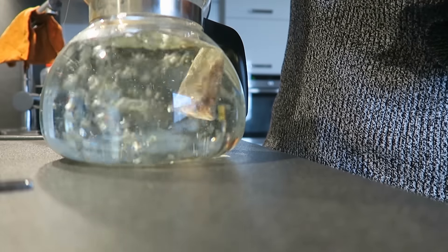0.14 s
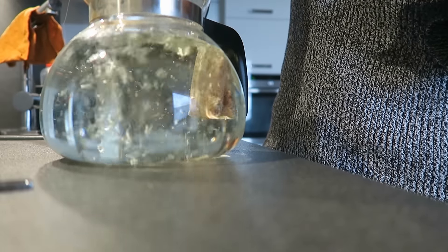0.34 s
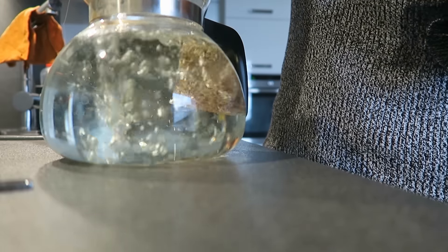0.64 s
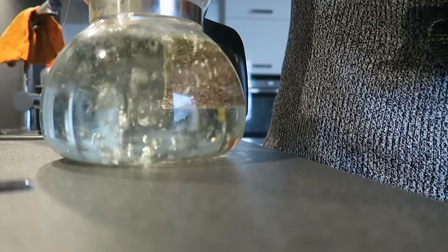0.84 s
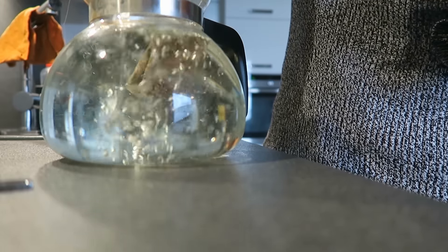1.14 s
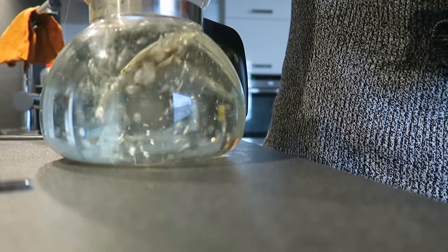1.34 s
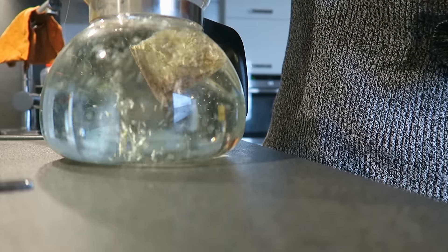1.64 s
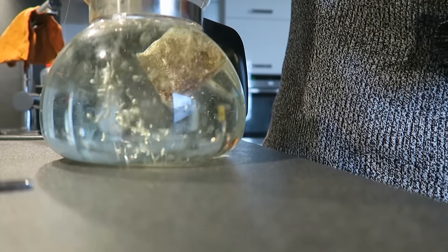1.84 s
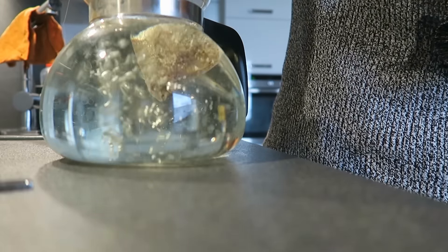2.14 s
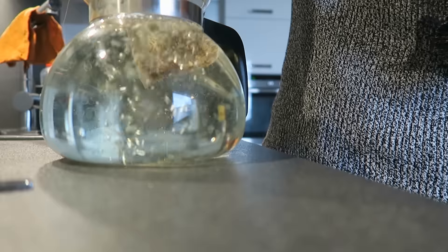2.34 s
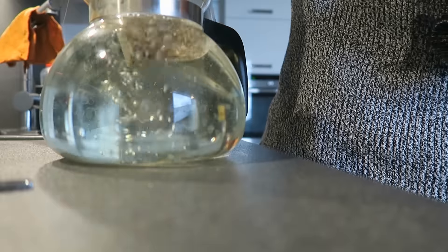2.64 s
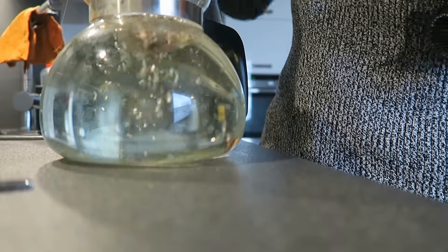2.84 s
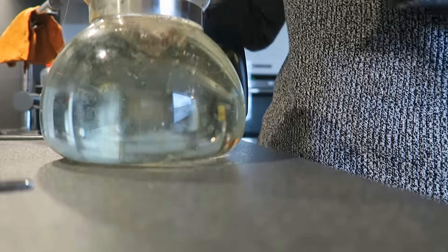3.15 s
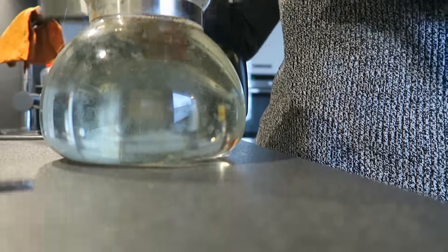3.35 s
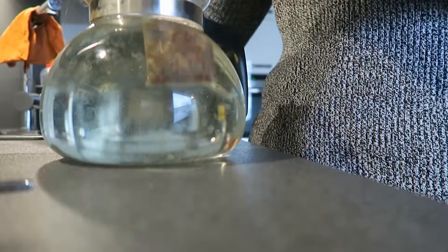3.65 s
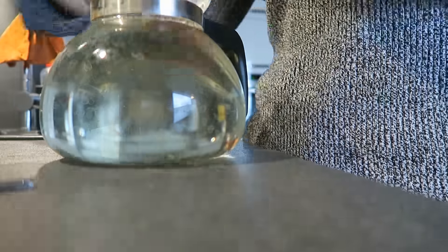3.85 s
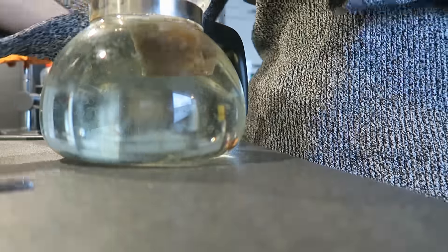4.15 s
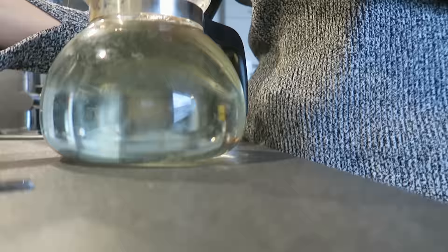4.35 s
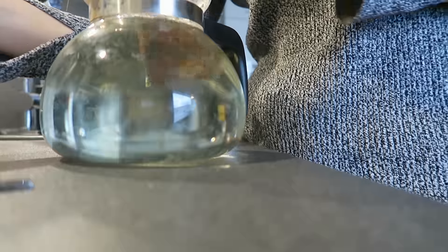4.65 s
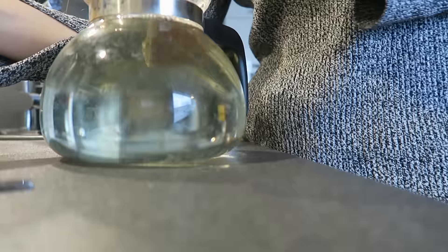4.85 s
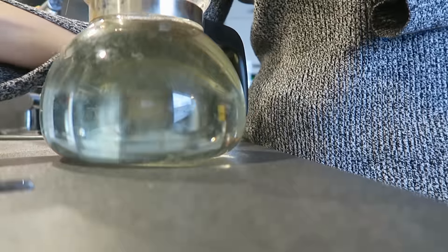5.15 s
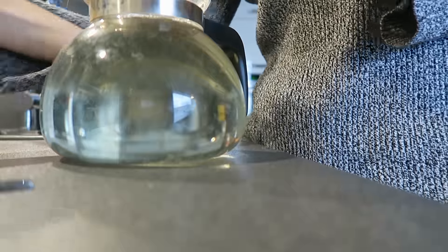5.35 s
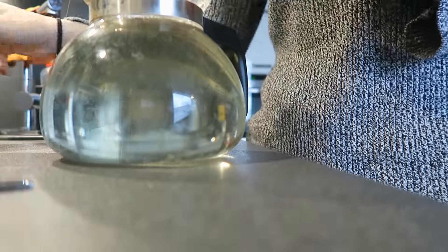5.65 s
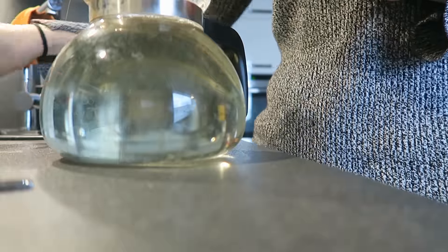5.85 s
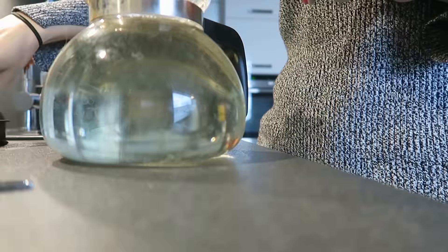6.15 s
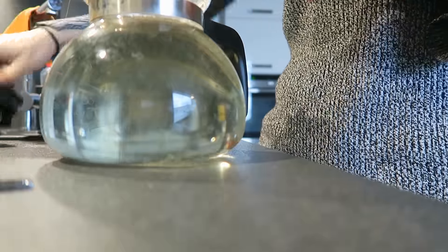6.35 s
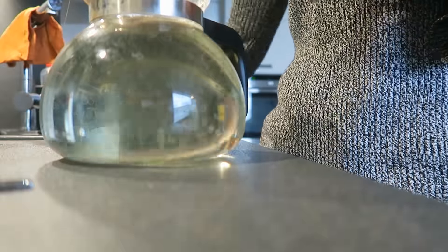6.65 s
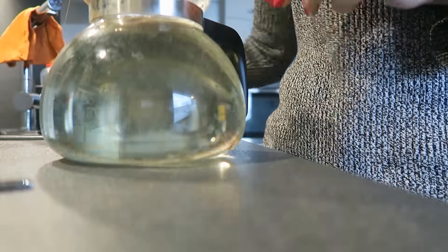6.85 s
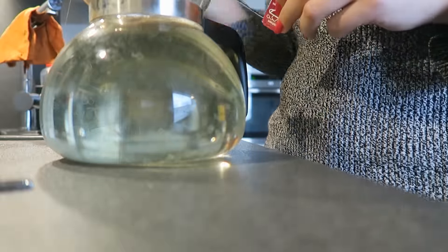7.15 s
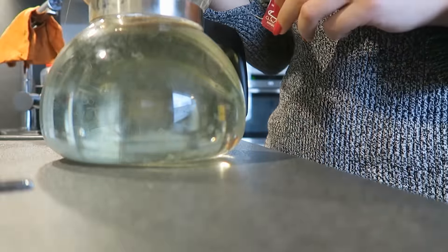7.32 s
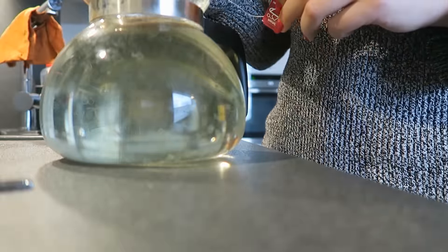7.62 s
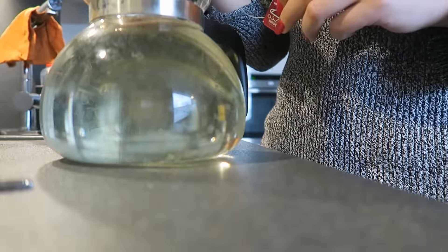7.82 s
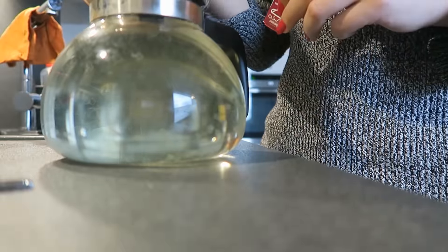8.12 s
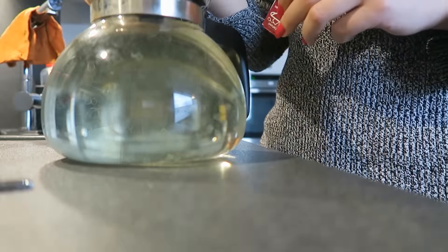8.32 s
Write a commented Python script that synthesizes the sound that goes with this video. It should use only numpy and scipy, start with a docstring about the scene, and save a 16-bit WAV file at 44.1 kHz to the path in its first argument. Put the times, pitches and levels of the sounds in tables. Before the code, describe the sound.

Hollow glassy bubbling thins to near silence; someone thumps and drags things on a kitchen counter, then bangs a small jar down.

```python
"""Glass kettle and a busy counter

A glass kettle just off the boil stands close by: damped tones pop and ring its glass, hiss makes splash and spray.
The pops thin out into faint ticks; then things are thumped down, pushed and dragged over a slab that booms and knocks.
A small jar is banged and clinked, with struck modes and noise bursts, and sets a tin rattling.
A faint hum of coloured noise lies under it all, and feedback delays give the kitchen's echo.
"""
import sys
import numpy as np
from scipy import signal
from scipy.fft import rfft, irfft, next_fast_len
from scipy.io import wavfile
from scipy.ndimage import uniform_filter1d

SR = 44100
rng = np.random.default_rng(int(sys.argv[2]) if len(sys.argv) > 2 else 0)


def log_audio(samples):
    """Write samples as a 16-bit WAV file to the path given in sys.argv[1]."""
    # one column per channel
    frames = np.atleast_2d(samples).T
    # limit to full scale, then quantise
    limited = np.clip(frames, -1, 1)
    pcm = np.round(limited * 32767).astype(np.int16)
    wavfile.write(sys.argv[1], SR, pcm)


N = 373967


def amp(db):
    """Decibels to gain."""
    return 10 ** (np.asarray(db) / 20)


def rms_one(x):
    """Scaled to rms 1."""
    return x / np.sqrt(np.mean(x ** 2) + 1e-20)


def gain_curve(rows):
    """Gain over time from (start_s, level_db) rows, silent outside them."""
    s, db = np.transpose(rows)
    return amp(np.interp(np.arange(N) / SR, s, db, left=-200, right=-200))


def at_hz(points, hz):
    """A (pitch_hz, value) table read on a log frequency axis."""
    table_hz, values = np.array(points).T
    return np.interp(np.log(hz), np.log(table_hz), values)


def coloured(x, spectrum):
    """Gives a flat signal a spectrum; rms 1."""
    size = next_fast_len(N)
    hz = np.maximum(np.arange(size // 2 + 1) * SR / size, 1)
    return rms_one(irfft(rfft(x, size) * amp(at_hz(spectrum, hz)), size)[..., :N])


def band(x, low_hz, high_hz):
    """Band-pass; an inaudible tone keeps the filter out of slow tiny numbers."""
    busy = 1e-15 * np.cos(np.arange(N))
    edges_hz = [low_hz, min(high_hz, .45 * SR)]
    return signal.sosfilt(signal.butter(2, edges_hz, "band", fs=SR, output="sos"), x + busy)


def clicks(times, db):
    """One click per event."""
    train = np.full(N, 1e-18)
    train[np.round(np.asarray(times) * SR).astype(int)] = amp(db)
    return train


def dying(force, t60):
    """Each click starts an envelope that falls 60 dB in t60 seconds."""
    return signal.lfilter([1], [1, -amp(-60 / (t60 * SR))], force)


def ring(force, hz, t60):
    """A two-pole resonator: a unit click sets a damped sine of starting height 1 ringing."""
    r, w = amp(-60 / (t60 * SR)), 2 * np.pi * hz / SR
    return signal.lfilter([0, np.sin(w)], [1, -2 * r * np.cos(w), r * r], force)


def struck(times, db, modes, low_hz, high_hz, luck_db=2.5):
    """Every blow excites every mode with a strength of its own; the band softens the contact."""
    luck = luck_db * rng.standard_normal((len(times), len(modes)))
    rings = np.zeros(N)
    for k, (hz, mode_db, t60) in enumerate(modes):
        rings += (-1) ** k * ring(clicks(times, db + mode_db + luck[:, k]), hz, t60)
    return band(rings, low_hz, high_hz)


def puffs(times, db, t60, low_hz, high_hz, channels=1, rise_s=0.002):
    """A burst of band noise that swells briefly and dies after each event."""
    swell = np.exp(-1 / (rise_s * SR))
    envelope = signal.lfilter([1 - swell], [1, -swell], dying(clicks(times, db), t60))
    noise = rms_one(band(rng.standard_normal((channels, N)), low_hz, high_hz))
    return band(envelope * noise, low_hz, high_hz)


def grains(per_s, spread_db):
    """Random clicks of uneven size and either sign; rms 1."""
    sizes = amp(spread_db * np.minimum(rng.exponential(1, N), 5)) * rng.choice([-1, 1], N)
    return rms_one(sizes * (rng.random(N) < per_s / SR) + 1e-18)


def place(sounds, times):
    """Lays each short sound at its time."""
    out = np.zeros(N + sounds.shape[1])
    for sound, s in zip(sounds, times):
        out[round(s * SR):][:len(sound)] += sound
    return out[:N]


def blips(times, db, hz, t60, rise_s, sag):
    """Damped tones, cut at 60 ms, that swell briefly and sag in pitch."""
    t = np.arange(round(.06 * SR)) / SR
    phase = 2 * np.pi * hz[:, None] * t * (1 - sag * t)
    envelope = amp(db[:, None] - 60 * t / t60) * (1 - np.exp(-t / rise_s))
    return place(envelope * np.sin(phase), times)


# hum colour: pitch_hz [Hz], density_db [dB per Hz, relative]
HUM_COLOUR = [(13, -5), (22, 14.5), (45, 1.5), (108, -3.5), (168, -6.5), (260, -9.5), (298, -7.5),
              (625, -19.5), (997, -13.5), (1080, -18), (11800, -42), (15500, -68)]
# stereo likeness of the hum: pitch_hz [Hz], likeness [1 same, 0 unrelated, -1 opposed]
HUM_LIKENESS = [(60, 0.98), (130, 0.31), (380, -0.72), (1200, -0.044), (9000, -0.15)]
HUM_DB = -46.5


def hum():
    """Steady room noise; mid against side makes the bass alike and the low middle opposed."""
    table_hz, alike = np.array(HUM_LIKENESS).T
    alike = np.clip(alike, -.9, .999)
    to_side = list(zip(table_hz, 10 * np.log10((1 - alike) / (1 + alike))))
    mid, side = rng.standard_normal((2, N))
    size = next_fast_len(N)
    hz = np.arange(1, size // 2 + 2) * SR / size
    side = irfft(rfft(side, size) * amp(at_hz(to_side, hz)), size)[:N]
    return amp(HUM_DB) * coloured(np.array([mid + side, mid - side]), HUM_COLOUR)


# level of the simmer between pops: start_s [s], level_db [dB]
SIMMER = [(0.0, -42.5), (1.49, -46.5), (1.71, -52), (1.97, -50), (3.1, -57), (3.3, -68)]
# kettle resonances that colour a pop: pitch_hz [Hz], level_db [dB], t60_s [s]
KETTLE_POP = [(925, -5, 0.019), (1083, 1.5, 0.0088), (1201, -3.5, 0.015), (1533, -34, 0.19)]
# low resonances of the kettle's belly: pitch_hz [Hz], level_db [dB], t60_s [s]
KETTLE_BELLY = [(103.3, -16, 0.25), (162.6, -14, 0.2), (287, -3.5, 0.033), (387.7, -3.5, 0.057),
                (529, -7.5, 0.036)]
# bright resonances of the kettle wall: pitch_hz [Hz], level_db [dB], t60_s [s]
KETTLE_WALL = [(1890, -14, .015), (2640, -9, .025), (2820, -10, .025), (3400, -14, .015), (4300, -18, .012)]
# how freely the kettle wall rings: start_s [s], level_db [dB]
WALL_RINGS = [(0, -7), (.55, 1.5), (2.2, 5), (3.6, -2)]


def simmer():
    """A wash of tiny bubbles through the vessel's resonances, with stray blips of any pitch."""
    wash = np.zeros(N)
    patchy = amp(3.5 * rms_one(band(rng.standard_normal(N), low_hz=3, high_hz=14)))
    for modes, share_db in [(KETTLE_POP, 1.5), (KETTLE_BELLY, -3.0), (KETTLE_WALL, -7.0)]:
        force = amp(share_db) * grains(per_s=1200, spread_db=4.0)
        if modes is KETTLE_WALL:   # the wall rings in spells
            force *= patchy * gain_curve(WALL_RINGS)
        for k, (hz, db, t60) in enumerate(modes):
            wash += (-1) ** k * amp(db) * ring(force, hz, t60)
    when, pitch, size = rng.random((600, 3)).T
    hz = 800 * 5.5 ** pitch
    db = 9.5 + 12 * size - 8.5 * np.log2(hz / 500)   # higher blips are weaker
    stray = blips(3.5 * when, db, hz, t60=0.014, rise_s=0.0008, sag=0)
    return gain_curve(SIMMER) * (rms_one(band(wash, low_hz=78, high_hz=7060)) + stray)


# big collapsing steam bubbles: start_s [s], pop_db [dB], pitch_hz [Hz], belly_db [dB relative to the pop]
POPS = [(0.044, -25.5, 935, -3.5), (0.122, -17, 884, 5.5), (0.056, -25, 1050, -14), (0.176, -23, 900, -1),
        (0.233, -20.5, 870, -6), (0.243, -26.5, 920, 7.5), (0.335, -20, 970, -3.5),
        (0.449, -22, 1050, -8.5), (0.484, -28, 1000, -25), (0.527, -27, 975, -5), (0.606, -23.5, 920, -3),
        (0.659, -13.5, 1045, -5.5), (0.722, -14.5, 1000, -2), (0.76, -17, 940, -3), (0.816, -18.5, 975, -6),
        (0.85, -27.5, 1850, -3), (0.871, -27, 980, 8.5), (0.974, -26.5, 1020, 1.5), (0.998, -36, 980, 8),
        (1.134, -17, 1070, -13), (1.184, -33.5, 1020, 0), (1.234, -14, 1046, -6.5),
        (1.368, -19.5, 1043, -2.5), (1.453, -22, 1090, -7.5), (1.508, -14.5, 1106, -13),
        (1.553, -11, 1090, -4), (1.582, -29, 920, 2), (1.6, -18.5, 1110, -8), (1.772, -20, 1155, -13),
        (1.928, -29.5, 970, -4), (1.949, -18.5, 1084, -7), (1.973, -23.5, 1060, -11),
        (2.094, -23, 1110, -30), (2.169, -21, 1134, -6.5), (2.263, -31.5, 1390, -19),
        (2.527, -32, 1080, -11), (2.651, -35, 1070, -11), (2.726, -28.5, 1100, -8.5),
        (2.794, -31.5, 1110, -6.5), (2.824, -30.5, 1190, -8.5)]
TRAILING_POPS = 3   # small ones after each big one
TRAIL_S, TRAIL_LOSS_DB, TRAIL_SPREAD_DB = .07, 8, 22.5
SMALL_POPS, SMALL_UNTIL_S = 78, 2.85
SMALL_DB, SMALL_FADE_DB_PER_S, SMALL_SPREAD_DB, SMALL_BELLY_DB = -26.5, 4, 29, -6
SMALL_HZ, SMALL_RISE_HZ_PER_S, SMALL_SPREAD_HZ = 943, 59, 460


def all_pops():
    """The big pops, each trailed by a few weak ones, and small ones at random that fade and rise in pitch."""
    big = np.transpose(POPS)
    lag, loss = rng.random((len(POPS) * TRAILING_POPS, 2)).T
    parent_s, parent_db = np.repeat(big[:2], TRAILING_POPS, axis=1)
    trail_s = parent_s + 0.016 + TRAIL_S * lag ** 2
    trail_db = parent_db - TRAIL_LOSS_DB - TRAIL_SPREAD_DB * loss
    when, size = rng.random((SMALL_POPS, 2)).T
    small_s = SMALL_UNTIL_S * when
    small_db = SMALL_DB - SMALL_FADE_DB_PER_S * small_s - SMALL_SPREAD_DB * size
    s, db = np.append(small_s, trail_s), np.append(small_db, trail_db)
    hz = SMALL_HZ + SMALL_RISE_HZ_PER_S * s + SMALL_SPREAD_HZ * rng.random(len(s)) ** 2
    return np.hstack([big, [s, db, hz, np.full(len(s), SMALL_BELLY_DB)]])


# bubbles that burst at the surface and slap the wall: start_s [s], wall_db [dB], spray_db [dB]
SPLASHES = [(0.121, -36, -52), (0.175, -68, -56), (0.233, -25, -58), (0.449, -35, -50), (0.606, -56, -57),
            (0.872, -39, -63), (0.93, -30, -62), (0.974, -25, -57), (1.186, -28.5, -65),
            (1.234, -32.5, -50.5), (1.553, -34, -68), (1.949, -40, -56), (1.976, -68, -58),
            (2.169, -29.5, -50), (2.65, -39, -63), (2.794, -36.5, -63), (3, -40, -67), (3.039, -43, -58),
            (3.075, -42.5, -59), (3.12, -60, -61)]
# edges of neighbouring splash bands: pitch_hz [Hz]
SPLASH_BANDS_HZ = [1300, 2100, 3000, 4100, 5200]
SPLASH_LUCK_DB = 5   # each splash favours some bands
WALL_DB, WALL_FOLLOWS = -24.5, 0.66   # the wall answers big and small pops more evenly


def kettle():
    """Bubbles pop at a pitch of their own and knock the vessel; splashes slap the wall."""
    s, pop, hz, belly = all_pops()
    big = blips(s, pop, hz, t60=0.025, rise_s=0.0011, sag=5.7)
    big += struck(s, pop, KETTLE_POP, low_hz=740, high_hz=1780)
    big += struck(s + 0.0013, pop + belly, KETTLE_BELLY, low_hz=81.0, high_hz=557)
    slaps, slap_db, _ = np.transpose(SPLASHES)
    s, wall = np.append(s, slaps), np.append(WALL_DB + WALL_FOLLOWS * pop, slap_db)
    big += gain_curve(WALL_RINGS) * struck(s + 0.001037, wall, KETTLE_WALL, low_hz=1530, high_hz=4730)
    luck = SPLASH_LUCK_DB * rng.standard_normal((len(s), len(SPLASH_BANDS_HZ)))
    for k, (low, high) in enumerate(zip(SPLASH_BANDS_HZ, SPLASH_BANDS_HZ[1:])):
        big += puffs(s, wall - 14 + luck[:, k], t60=0.031, low_hz=low, high_hz=high, rise_s=0.0073)[0]
    return big + simmer()


POP_SPRAY_DB = -46.5   # relative to each big pop, which throws a little spray


def spray():
    """Bursting bubbles throw a short wide hiss, its noise separate in each channel."""
    s, pop = np.transpose(POPS)[:2]
    bursts, _, hiss = np.transpose(SPLASHES)
    wide = dict(t60=0.16, low_hz=4370, high_hz=13000, channels=2, rise_s=0.00084)
    return puffs(s, pop + POP_SPRAY_DB, **wide) + puffs(bursts, hiss, **wide)


# faint ticks as the kettle settles: start_s [s], level_db [dB]
TICKS = [(3.963, -57), (4.029, -54), (4.1295, -53), (4.1625, -56), (4.297, -54.5), (4.414, -56.5),
         (4.497, -50.5)]
# thin ring of a tick: pitch_hz [Hz], level_db [dB], t60_s [s]
TICK_RING = [(3200, -2.5, 0.049), (4540, -5, 0.022)]


def ticks():
    """Each tick is a short dry hiss with a thin ring."""
    s, db = np.transpose(TICKS)
    hiss = puffs(s, db - 11.0, t60=0.085, low_hz=2800, high_hz=6500, rise_s=0.00084)[0]
    return hiss + struck(s, db, TICK_RING, low_hz=2400, high_hz=6000)


# a faint low tone comes and goes: start_s [s], level_db [dB]
FAINT_TONE = [(4.05, -71), (4.16, -56), (4.35, -57.5), (4.42, -93)]
FAINT_TONE_HZ = 301.3


def faint_tone():
    """A soft sine under a gain curve."""
    return gain_curve(FAINT_TONE) * np.sin(2 * np.pi * FAINT_TONE_HZ * np.arange(N) / SR)


# thumps on the counter: start_s [s], knock_db [dB], boom_db [dB relative to the knock],
# leading_mode [slab mode, 0 low to 2 high], clack_db [dB relative to the knock]
THUMPS = [(4.532, -10.5, 3.5, 1.26, -7.5), (4.556, -41, -13, 1.6, -8), (4.604, -47, -5, 2.0, -2.5),
          (4.69, -11.5, 1, 1.35, -15), (4.748, -30, 11.5, 0.58, -4.5), (4.822, -19.5, 5.5, 1.36, -10.5),
          (4.842, -30, -8, 2, -8.5), (4.981, -24.5, -11, 2.0, -23), (5.088, -16.5, -6, 1.85, -17),
          (5.195, -20.5, -11, 1.1, -17.5), (5.236, -26, -7, 1, -20.5), (5.285, -17, 4, 0.83, -21),
          (5.304, -27, -9, 0.45, -14.5), (5.355, -27, -7, 0.088, -22), (5.564, -29.5, -5, 1.15, -22),
          (5.617, -29, 3, 0.4, -21), (8.135, -36.5, 7, 2.05, -18), (8.165, -34.5, 11.5, 1.46, -20)]
# knocking modes of the counter top: pitch_hz [Hz], level_db [dB], t60_s [s]
COUNTER_KNOCK = [(247, -17.5, 0.13), (416, -13, 0.2), (497, -10, 0.031), (595.5, -3, 0.054),
                 (772, -12, 0.043)]
# booming modes of the slab: pitch_hz [Hz], level_db [dB], t60_s [s]
COUNTER_BOOM = [(55.9, -6, 0.99), (89.4, 3, 0.21), (114.6, 6.5, 0.27)]
# clacking modes of the counter top: pitch_hz [Hz], level_db [dB], t60_s [s]
COUNTER_CLACK = [(859, 0.5, 0.047), (1164, 1.5, 0.028), (1490, -0.5, 0.028), (1672, -0.5, 0.025),
                 (2220, -4, 0.021), (2800, -11, 0.027)]
NEXT_MODE_LOSS_DB = 13   # per mode away from the leading one


def counter():
    """Heavy soft thumps: the slab booms, its top knocks and clacks, loose things rattle after."""
    s, knock, weight, lead, clack = np.transpose(THUMPS)
    booms = [knock + weight - NEXT_MODE_LOSS_DB * abs(lead - k) for k in range(len(COUNTER_BOOM))]
    boom = np.zeros(N)
    for share, (hz, db, t60) in zip(booms, COUNTER_BOOM):
        boom += ring(clicks(s + 0.0025, share + db), hz, t60)
    body = band(boom, low_hz=35.3, high_hz=250)
    body += struck(s, knock, COUNTER_KNOCK, low_hz=192, high_hz=900, luck_db=4)
    body += struck(s, knock + clack + 6, COUNTER_CLACK, low_hz=825, high_hz=2900)
    # the slab shudders
    body += puffs(s, booms[2] - 9, t60=0.47, low_hz=63, high_hz=300, rise_s=0.00077)[0]
    body += puffs(s, booms[1] - 8, t60=0.55, low_hz=66.6, high_hz=108.4, rise_s=0.004)[0]
    # its top hums on
    body += puffs(s, knock - 17, t60=0.31, low_hz=347, high_hz=780, rise_s=0.0031)[0]
    crack = puffs(s, knock + clack - 6, t60=0.09, low_hz=900, high_hz=4460)[0]
    for low, high in [(1560, 1820), (2150, 2700)]:   # two rough bands linger
        crack += puffs(s, knock + clack - 17, t60=0.37, low_hz=low, high_hz=high)[0]
    loose = band(grains(per_s=750, spread_db=3), low_hz=383, high_hz=2610)
    loose = rms_one(band(loose, low_hz=373, high_hz=2610))
    rattle = dying(clicks(s, knock + clack), t60=.25) * loose
    return body + band(crack, low_hz=295, high_hz=6060) + amp(-6.5) * rattle


# something pushed over the slab: start_s [s, full rub begins], held_s [s], rub_db [dB],
# squeak_db, rumble_db [dB relative to the rub]
PUSHES = [(4.997, 0.077, -29.5, -12, 5), (5.5, 0.028, -39.5, -34, -6)]
# colour of the push: pitch_hz [Hz], density_db [dB per Hz, relative]
PUSH_COLOUR = [(150, -46), (250, -3.5), (320, -4.5), (571, 0), (935, -8.5), (2300, -15.5), (3500, -20.5),
               (4250, -22.5), (8000, -36.5), (17600, -120)]
# squeak resonance: pitch_hz [Hz], t60_s [s]
SQUEAK = (2450, .008)
# something light dragged: start_s [s], rub_db [dB]
DRAG_STROKE = [(6.12, -33.5), (6.24, -30.5), (6.27, -27.5), (6.31, -33.5), (6.34, -24), (6.409, -26.5),
               (6.44, -32), (6.5, -46.5), (6.62, -58.5)]
# colour of the drag: pitch_hz [Hz], density_db [dB per Hz, relative]
DRAG_COLOUR = [(88, -28), (150, -11.5), (333, -3), (387, 7), (468, -7), (566, 3.5), (623, 2), (1980, 6.5),
               (2400, -4.5), (3300, -10.5), (4000, -15), (11400, -42.5), (13200, -55)]
# sharp catches on the slab: start_s [s], level_db [dB], pitch_hz [Hz]
CATCHES = [(4.9966, -22.5, 1600), (5.025, -31, 4060), (5.042, -34, 4240), (5.074, -25.5, 2630),
           (5.124, -30.5, 1290), (6.083, -17, 3180), (6.1015, -4.5, 1770), (6.118, -42, 1580),
           (6.27, -24, 1440), (6.335, -33, 1420), (6.362, -18, 1940)]
PUSH_RISE_DB_PER_S, PUSH_FADE_DB_PER_S = 1797, 395


def drags():
    """Stick-slip clicks under each stroke, more uneven for the push than the drag, and sharper catches."""
    t = np.arange(N) / SR
    slips = grains(per_s=3000, spread_db=2.6)
    rub = coloured(slips, PUSH_COLOUR)
    rumble = rms_one(band(slips, low_hz=82, high_hz=164))
    squeak = rms_one(ring(slips, *SQUEAK))
    push = np.zeros(N)
    for s, held, db, squeak_db, rumble_db in PUSHES:
        loss_db = np.maximum(PUSH_RISE_DB_PER_S * (s - t), PUSH_FADE_DB_PER_S * (t - s - held)).clip(0)
        push += amp(db - loss_db) * (rub + amp(squeak_db) * squeak + amp(rumble_db) * rumble)
    s, db, hz = np.transpose(CATCHES)
    catches = blips(s, db, hz, t60=.015, rise_s=.0003, sag=0)
    catches += puffs(s, db - 6, t60=.02, low_hz=400, high_hz=4500)[0]
    catches += puffs(s, db - 7.5, t60=0.091, low_hz=353, high_hz=2800)[0]
    catches += struck(s, db - 37.5, COUNTER_BOOM[1:], low_hz=60, high_hz=250)
    catches += struck(s, db - 7.5, COUNTER_KNOCK, low_hz=236, high_hz=895)
    drag = gain_curve(DRAG_STROKE) * coloured(grains(per_s=2900, spread_db=1.0), DRAG_COLOUR)
    return push + catches + drag


# the jar banged down: start_s [s], clack_db [dB], thud_db, crack_db [dB relative to the clack],
# crack_hz [Hz], ring_db [dB relative to the clack], low_ring_db [dB relative to the ring]
BANGS = [(7.502, -2.5, -20, -1, 2270, -21.5, 1), (8.19, -16.5, -0.5, -17, 1550, -25, 14),
         (8.205, -0.5, -4.5, -2, 1390, -31.5, 1), (8.303, -33.5, 7, 6, 1400, -14, 2)]
# the jar clinks and bounces: start_s [s], clack_db [dB], ring_db, crack_db [dB relative to the clack],
# crack_hz [Hz], low_ring_db [dB relative to the ring]
CLINKS = [(7.839, -15, 2, 6.5, 3634, -5.5), (7.885, -18.5, -12, -10, 3770, 6.5),
          (7.921, -16.5, -12, -6, 4400, -2), (8.019, -29, -9, -10, 5070, -21)]
# clack of the jar's contact: pitch_hz [Hz], level_db [dB], t60_s [s]
JAR_CLACK = [(842, -14, 0.027), (1019, -1, 0.026), (1280, 1, 0.0068), (1454, -5.5, 0.011)]
# dull thud of the jar: pitch_hz [Hz], level_db [dB], t60_s [s]
JAR_THUD = [(316, 6.5, 0.017), (385, 3, 0.03), (501, -9, 0.06)]
# ringing modes of the jar's glass: pitch_hz [Hz], level_db [dB], t60_s [s]
JAR_RING = [(875, -21, .15), (1010, -21, .2), (2132, -10, .2), (3070, -7, .16), (3402, -1.5, .16),
            (3530, -13, .12), (3715, -16, .3), (3874, -16, .09), (4088, -16, .16), (4463, -13, .12),
            (5010, -22, .07)]
LOW_RINGS = 4   # the lowest modes have a level of their own in each blow
BANG_BOOM_DB, CLINK_BOOM_DB, CLINK_THUD_DB = -37.5, -22.5, -19   # relative to the clack


def jar():
    """Hard short contacts: a crack, a clack, a thud, the slab below and the glass ringing on."""
    blows = [(s, db, db + BANG_BOOM_DB, db + thud, db + crack, hz, db + bell, low)
             for s, db, thud, crack, hz, bell, low in BANGS]
    blows += [(s, db, db + CLINK_BOOM_DB, db + CLINK_THUD_DB, db + crack, hz, db + bell, low)
              for s, db, bell, crack, hz, low in CLINKS]
    s, clack, boom, thud, crack, crack_hz, bell, low = np.transpose(blows)
    body = struck(s, clack, JAR_CLACK, low_hz=674, high_hz=1790)
    body += struck(s + 0.00041, boom, COUNTER_BOOM[1:], low_hz=60.4, high_hz=263)
    body += struck(s + 0.0026, thud, JAR_THUD, low_hz=185, high_hz=800)
    glass = struck(s, bell + low, JAR_RING[:LOW_RINGS], low_hz=710, high_hz=7050)
    glass += struck(s, bell, JAR_RING[LOW_RINGS:], low_hz=1500, high_hz=8240)
    # a random flutter roughens the ring; a noisy shimmer follows
    body += glass * amp(3 * rms_one(band(rng.standard_normal(N), low_hz=15, high_hz=90)))
    body += puffs(s, bell - 17, t60=0.17, low_hz=3150, high_hz=6430, rise_s=0.001)[0]
    # the room holds a low noisy tail of the thud
    body += puffs(s, thud - 16, t60=0.18, low_hz=265, high_hz=646, rise_s=0.0058)[0]
    # the slab shudders
    body += puffs(s, boom + 2.1, t60=0.57, low_hz=84.7, high_hz=139, rise_s=0.0036)[0]
    # the crack, with clatter after the contact
    body += blips(s, crack, crack_hz, t60=0.025, rise_s=0.000067, sag=4.1)
    body += puffs(s, crack - 18, t60=0.013, low_hz=1240, high_hz=5400)[0]
    # a longer, diffuse noisy tail of the clatter
    body += puffs(s, crack - 27, t60=0.075, low_hz=1500, high_hz=4500, rise_s=0.0015)[0]
    # splintery noise and a bright edge
    body += puffs(s, crack - 1.5, t60=0.011, low_hz=1460, high_hz=5120)[0]
    return body + puffs(s, crack - 25, t60=0.0096, low_hz=5020, high_hz=13000)[0]


# a tin nearby rattles after the first bang: start_s [s], level_db [dB]
TIN_HITS = [(7.503, -26), (7.512, -25.5), (7.652, -41)]
# modes of the tin: pitch_hz [Hz], level_db [dB], t60_s [s]
TIN_MODES = [(924, -10, 0.061), (1700, -3, 0.025), (2186, 1.5, 0.039)]


def tin():
    """Each knock rings the tin and leaves it rattling, with a broad noisy tail."""
    s, db = np.transpose(TIN_HITS)
    rattle = puffs(s, db - 35.5, t60=0.26, low_hz=585, high_hz=4940)[0]
    force = clicks(s, db) + rattle
    body = sum(amp(level_db) * ring(force, hz, t60) for hz, level_db, t60 in TIN_MODES)
    return body + puffs(s, db - 21.5, t60=0.54, low_hz=600, high_hz=4300, rise_s=.006)[0]


KITCHEN_T60_S, WALL_CUT_HZ, KITCHEN_DB = 0.67, 17000, -30.5


def kitchen(x):
    """Room echo: fourteen feedback delays a side, duller on every round."""
    size = next_fast_len(N + SR // 2)
    angle = -2j * np.pi * np.arange(size // 2 + 1) / size
    dull = np.exp(-2 * np.pi * WALL_CUT_HZ / SR)
    wall = (1 - dull) / (1 - dull * np.exp(angle))
    out = np.zeros((2, len(angle)), complex)
    for k, lag in enumerate((np.geomspace(.011, .049, 28) * SR).astype(int)):
        loop = amp(-60 * lag / SR / KITCHEN_T60_S) * wall * np.exp(lag * angle)
        out[k % 2] += loop / (1 - loop) * (-1) ** (k // 2)
    thin = band(x, low_hz=193, high_hz=15200)   # the boom travels in the slab, not the air
    return irfft(out * rfft(thin, size), size)[:, :N]


def scene():
    """Kettle a little to the left; the lows of the slab reach the left channel a moment earlier."""
    pot, slab, taps = kettle() + ticks(), counter() + drags(), jar() + tin()
    lows = uniform_filter1d(slab, size=5)
    late_slab = slab - lows + np.roll(lows, 2)   # lows two samples late
    hands = np.array([slab + taps, late_slab + taps])
    belly = band(pot, low_hz=183, high_hz=516) * [[.2], [-.2]]   # its low knock favours the left
    near = belly + pot * amp([[.25], [-.25]]) + hands * amp([[.1], [-.1]])
    echo = amp(KITCHEN_DB) * kitchen(pot + slab + taps)
    return near + echo + spray() + hum() + faint_tone()


MIC_LOW_CUT_HZ, OVERLOAD, CUTOFF_HZ = 52, 1, 15800


def record(dry):
    """The microphone loses the deepest bass, peaks beyond the overload level clip, the top is cut."""
    heard = signal.sosfilt(signal.butter(2, MIC_LOW_CUT_HZ, "high", fs=SR, output="sos"), dry)
    steep = signal.cheby2(12, 70, CUTOFF_HZ * 1.04, fs=SR, output="sos")
    return signal.sosfilt(steep, np.clip(heard, -OVERLOAD, OVERLOAD))


dry = scene()
out = record(dry)
log_audio(out)
```